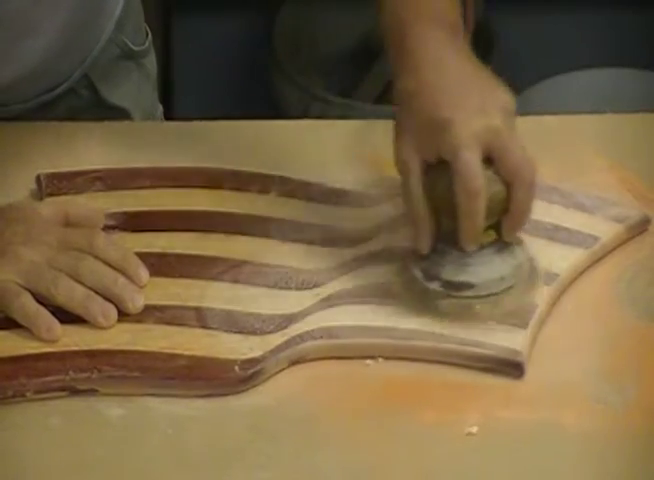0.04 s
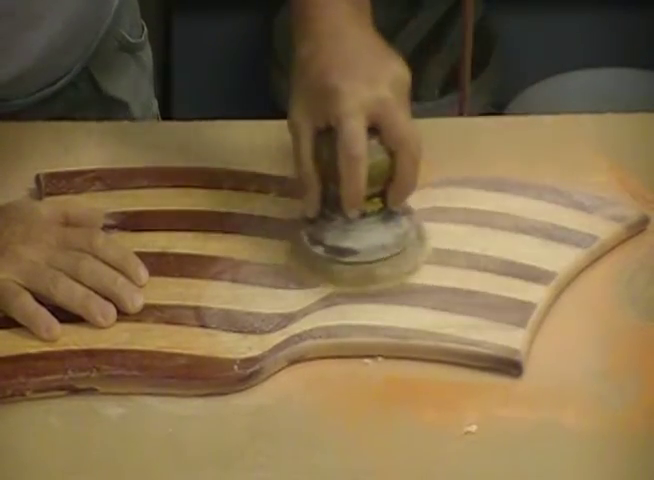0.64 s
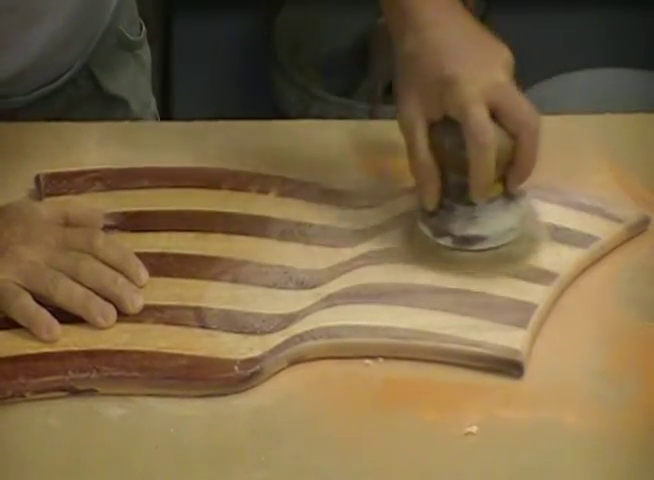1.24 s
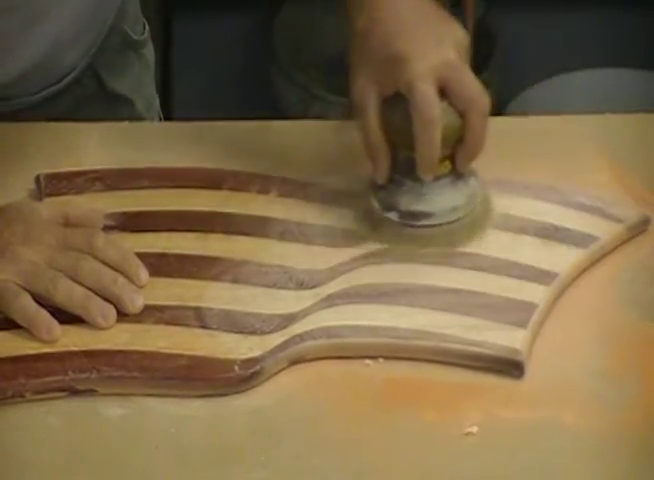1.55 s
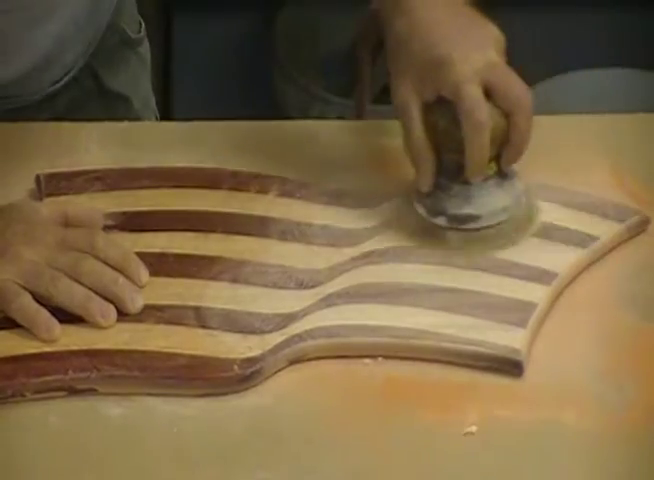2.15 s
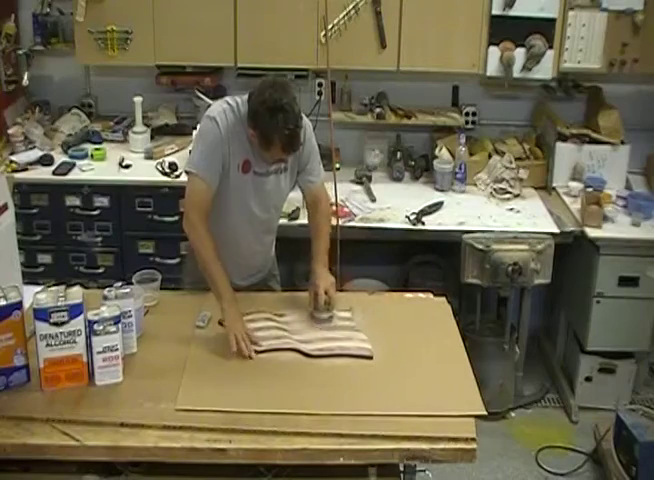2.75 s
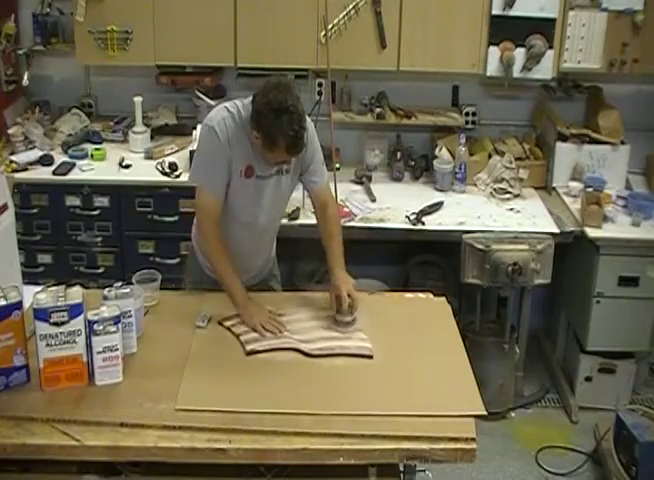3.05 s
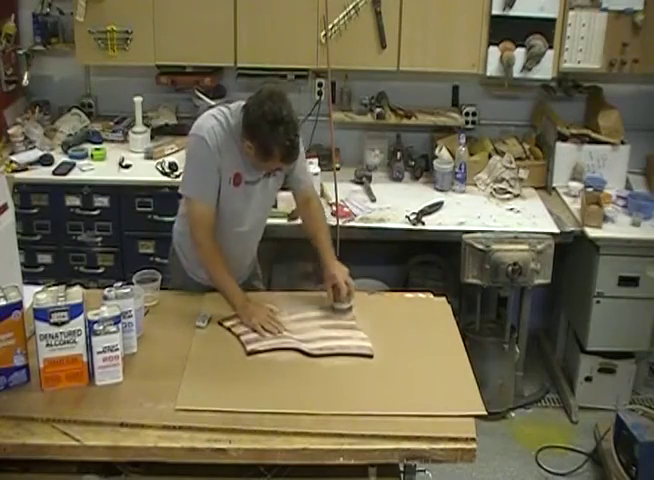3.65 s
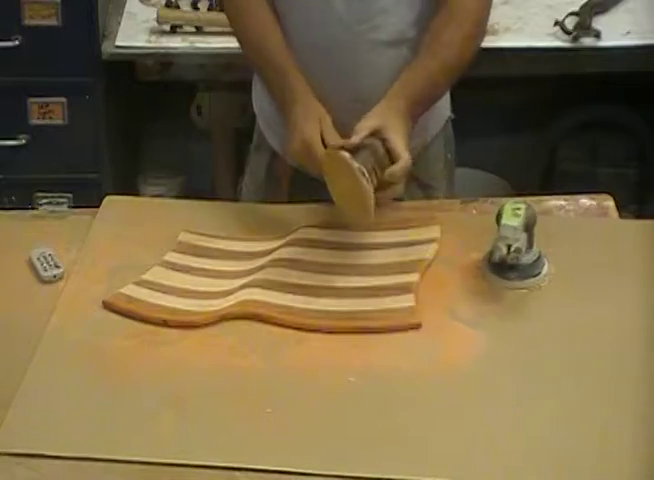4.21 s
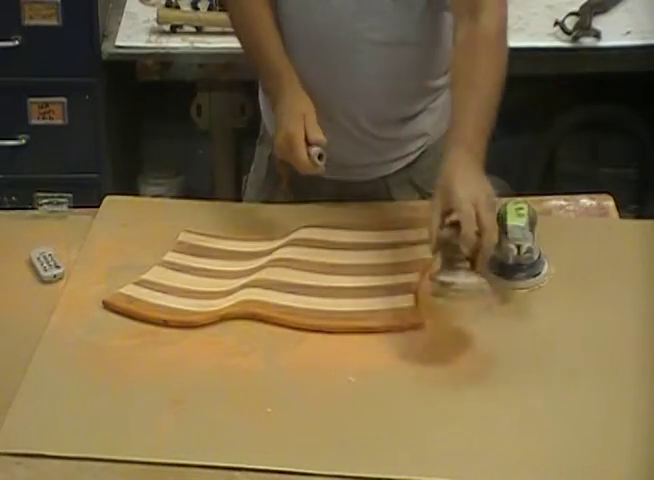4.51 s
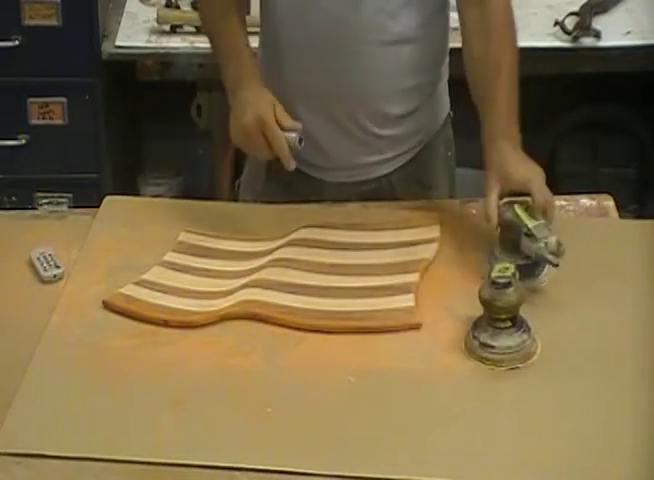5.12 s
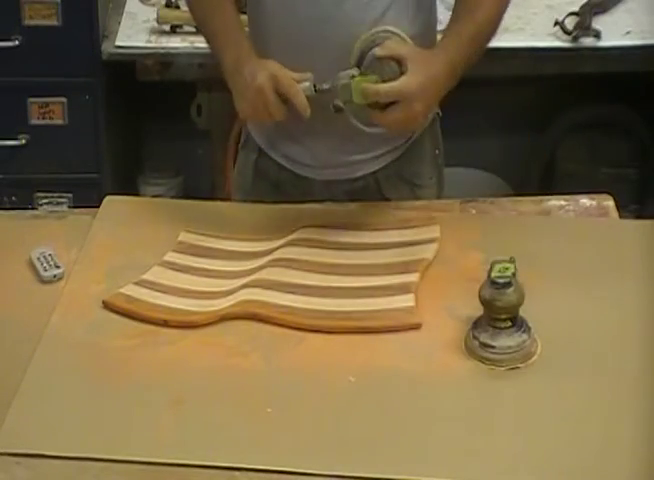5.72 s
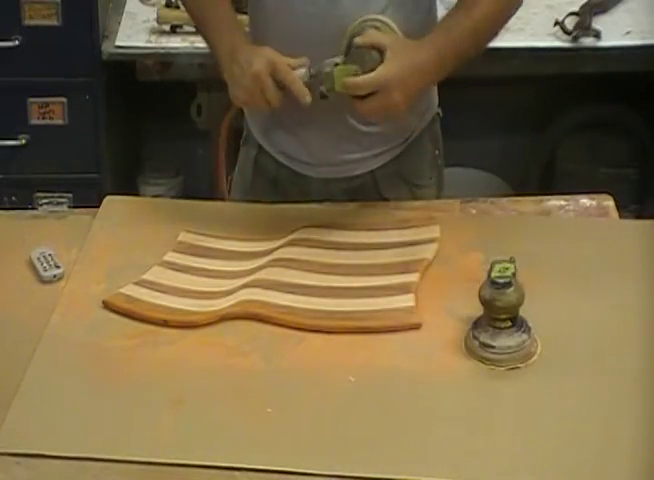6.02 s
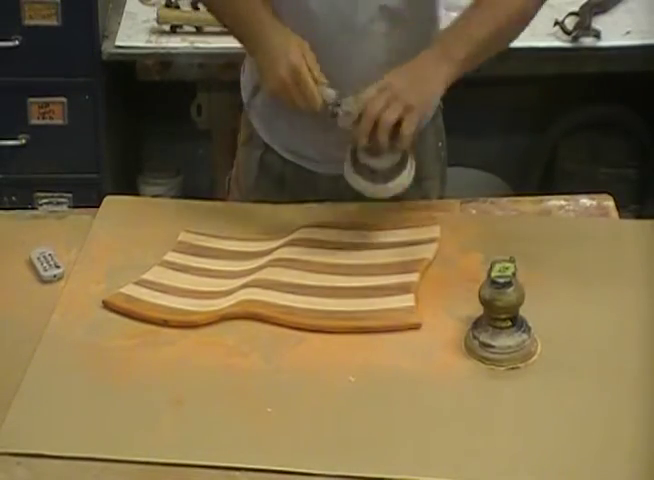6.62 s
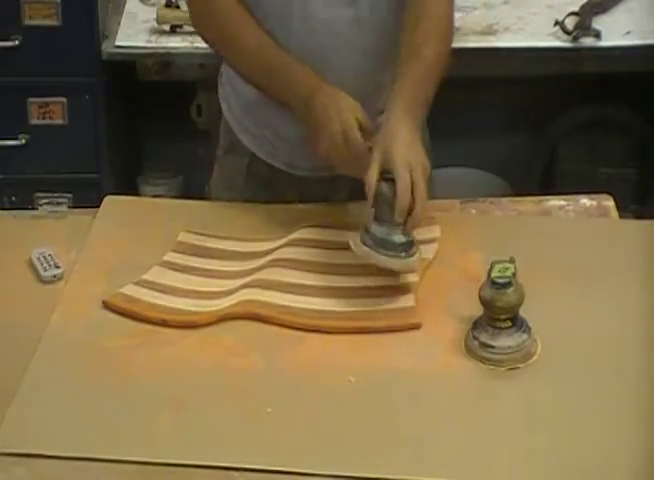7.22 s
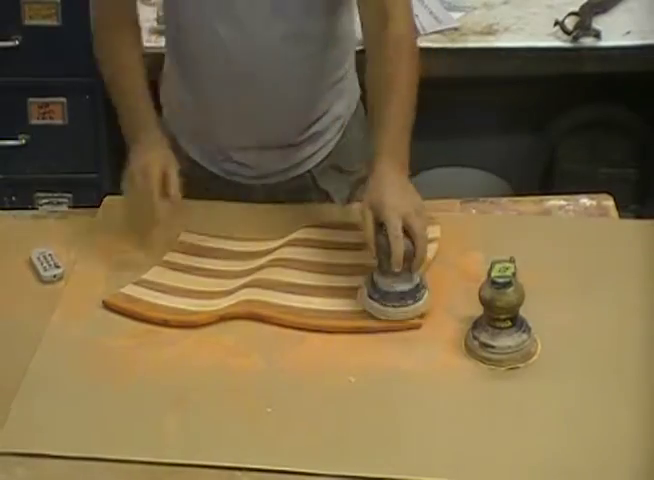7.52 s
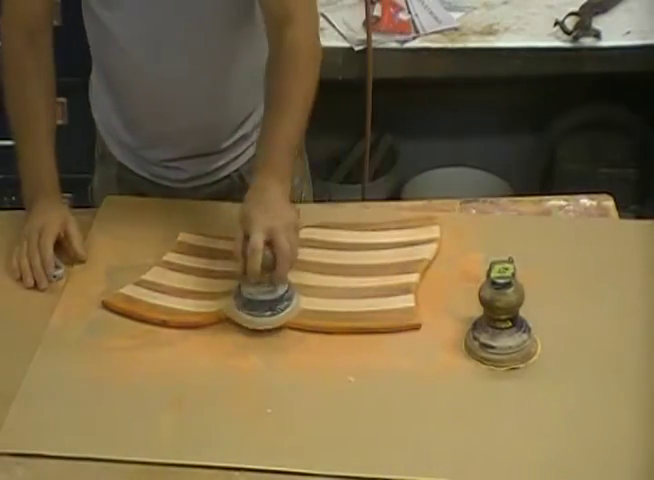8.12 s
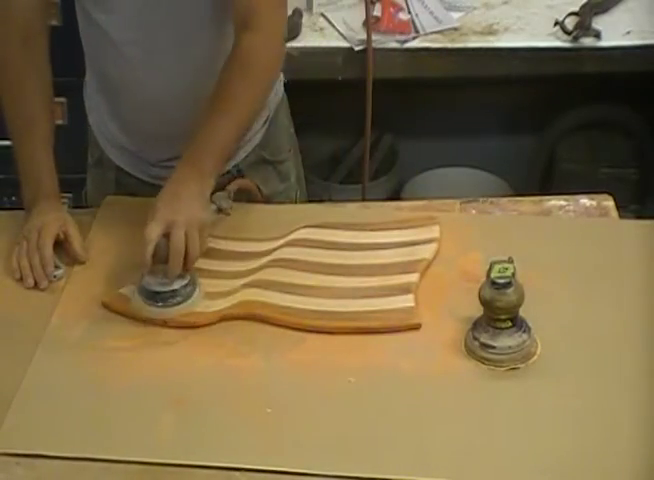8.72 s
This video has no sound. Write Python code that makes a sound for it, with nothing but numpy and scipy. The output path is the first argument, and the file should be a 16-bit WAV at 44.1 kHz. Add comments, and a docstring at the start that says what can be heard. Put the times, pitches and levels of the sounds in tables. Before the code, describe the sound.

An air sander whines and hisses on wood, stops, a hose coupling pops and hisses, then a second sander spins up.

```python
"""First comes the whine and hiss of an air-driven orbital sander on a wooden board, close to the
microphone, then from farther across the workshop. Vanes chop the air; the off-centre pad shakes and rubs.
The sound cuts off, the hose pops free, the coupler's sleeve rings and the tool is put down. The hose
is pushed, hissing, onto a second sander, which spins up on the board over a faint machinery hum.
The recorder's gain control ducks the pop and the hiss and lets the room swell back."""
import sys
import numpy as np
from scipy import signal
from scipy.fft import rfft, irfft, next_fast_len
from scipy.io import wavfile
from scipy.ndimage import uniform_filter1d

SR = 44100
rng = np.random.default_rng(int(sys.argv[2]) if len(sys.argv) > 2 else 0)


def write(x):
    x = np.atleast_2d(x).T
    wavfile.write(sys.argv[1], SR, np.round(np.clip(x, -1, 1) * 32767).astype(np.int16))


N = 390726
T = np.arange(N) / SR
FAR_START_S, FAR_END_S = 2.345, 4.054  # the microphone stands farther off
LEFT_RIGHT = np.array([[1], [-1]])


# Pad on the board: (frequency [Hz], density [dB])
SCRAPE_SPECTRUM = [(200, -55), (500, -19.5), (750, -14.5), (1050, -5.5), (1300, 0.5), (1700, -33.5),
                   (4000, -63.5)]

def sander(t, speed, levels, orders, upper, air, spin, whine_db, third_db, shake_db, drone_db, rub_db,
           scrape_db, flow_db, air_db, buzz_db, strain, waver, chop, jitter, flutter_db, pan_db,
           side_db, whistles=()):
    """Five vanes chop the air into a whine; the pad rubs once a turn. spin is the share of full speed."""
    full_hz, = curves(speed, t)
    first, second, third, rub, shake = curves(levels, t)
    sag_percent = 100 * (1 - full_hz / full_hz.mean())  # pressing down slows the motor
    # The grit grabs and lets go, so the speed trembles, most while the motor is slow.
    slack = np.clip(.92 - spin, 0, .3)
    sputter = np.clip(12 * (.998 - spin), 0, .75)
    tremble = (jitter + .16 * slack + .012 * sputter) * wobble(70, t)
    vane_phase = phase_of(spin * full_hz * (1 + tremble))
    shaft_phase = vane_phase / 5
    slip_phase = phase_of(25 * (1 + .35 * wobble(5, t)))  # the free-spinning pad adds side tones

    def partial(phase, echo=.24, spread=.12):
        """A tone that flutters, beats with its reflections and differs in phase left and right."""
        gain = amp(.7 * wobble(8, t) + flutter_db * wobble(75, t))
        phase = phase + rng.uniform(0, 2 * np.pi) + LEFT_RIGHT * spread * wobble(7.01, t)
        reflected = wobble(32, t) * np.sin(phase) + wobble(32, t) * np.cos(phase)
        direct = np.sin(phase + sputter * wobble(130, t)) * amp(6 * sputter * wobble(90, t) - 3 * sputter)
        return unit((direct + waver * echo * reflected) * gain)

    whine = sum(amp(db + dips(k, t)) * partial(k * vane_phase, echo, spread=.18)
                for k, db, echo in [(1, first, .15), (2, second, .22), (3, third + third_db, .28)])
    whine *= amp(whine_db) * spin ** 1.1
    exhaust_hz, width_hz = 3075, 30  # overtones swell as they cross this resonance
    for order, db in [(5 * k, db) for k, db in upper] + list(whistles):
        swell_db = 5 / (1 + ((order * spin * full_hz / 5 - exhaust_hz) / width_hz) ** 2)
        gain = spin ** 9 * amp(flow_db + db - 10 * sputter + swell_db + 1.8 * wobble(8, t))
        whine += gain * partial(order * shaft_phase, echo=.5, spread=.18)

    shaft = [amp(db) * partial(k * shaft_phase) for k, db in orders]
    side_tones = sum(amp(db) * partial(k * shaft_phase + slip_phase) for k, db in orders[5:])
    body = spin ** 5 * amp(shake + shake_db) * unit(sum(shaft[:2]))
    housing = spin * amp(drone_db + 1.5 * strain * sag_percent) * unit(sum(shaft[2:4]))
    pad = spin ** 1.2 * amp(rub + rub_db) * unit(sum(shaft[5:]) + amp(side_db) * side_tones)
    scrape = amp(rub + scrape_db) * unit(rush(SCRAPE_SPECTRUM, t) * (1 + .5 * np.sin(shaft_phase)))
    buzz = amp(flow_db + buzz_db) * spin ** 9 * vane_buzz(shaft_phase, t)
    hiss = amp(flow_db + air_db) * exhaust_hiss(air, chop, shaft_phase, t)
    return (whine + body + housing + pad + scrape + buzz + hiss) * amp(LEFT_RIGHT * pan_db)


# Gaps in the whine: (time [s], vane harmonic, depth [dB])
WHINE_DIPS = [(0.13, 2, 8), (0.17, 1, 14), (0.485, 2, 17), (0.605, 2, 8), (0.635, 2, 10), (0.67, 1, 9),
              (0.89, 1, 8), (1.15, 2, 12), (1.3, 2, 6), (1.345, 2, 9), (1.43, 2, 6), (1.585, 1, 9),
              (1.61, 2, 13), (1.675, 2, 15), (1.71, 2, 11), (1.765, 1, 10), (1.83, 2, 7), (1.91, 1, 9),
              (1.925, 2, 12), (2.025, 2, 14), (2.06, 2, 16), (2.135, 2, 12), (2.21, 2, 9), (2.265, 2, 11),
              (2.31, 2, 12), (2.73, 1, 9), (2.803, 3, 17), (2.815, 1, 13), (3.11, 3, 14), (3.285, 1, 19),
              (3.41, 1, 9), (3.505, 1, 9), (3.595, 1, 15), (3.737, 3, 14), (3.77, 1, 16), (3.853, 1, 11),
              (3.945, 1, 12), (3.98, 1, 13), (7.765, 1, 10), (7.86, 1, 8)]

def dips(harmonic, t, fade_s=.012):
    """Change in dB as one vane harmonic drops out for a moment."""
    return sum(-db * np.exp(-abs(t - s) / fade_s) for s, k, db in WHINE_DIPS if k == harmonic)


# Hiss, stroke by stroke: (time [s], level [dB])
HISS_LEVELS = [(0, -.3), (.3, .3), (.42, -1.7), (.52, 0), (1.15, -.2), (1.35, -1.4), (1.52, -1), (1.68, .7),
               (1.81, 2), (1.93, .9), (2.3, 1.1), (2.45, 1), (2.55, -2), (2.7, -1.5), (2.78, 1), (3.0, .8),
               (3.13, -2), (3.25, 0), (3.65, .4), (3.75, 2.6), (3.9, .9), (4.03, -2.3), (7.64, 1),
               (8.04, -1), (8.21, 1.2), (8.5, -.3), (8.7, .5), (8.85, -.3)]

def exhaust_hiss(spectrum, chop, shaft_phase, t):
    """Air puffs at the vane rate and twice a turn; the colour shifts as the grit meets new grain."""
    puffs = 1 + chop * (np.sin(5 * shaft_phase) + np.sin(2 * shaft_phase))
    air = patchy(rush(spectrum, t), depth_db=1.3)
    flicker = amp(.45 * wobble(35, t) + .3 * wobble(9, t))
    stroke_db, = curves(HISS_LEVELS, t)
    return amp(stroke_db) * unit(air * puffs * flicker)


# Muffler: (frequency [Hz], gain [dB])
MUFFLER_RESPONSE = [(1300, -5), (2200, -1), (3500, -1), (4600, -1), (5700, 3.5), (6600, 6), (7200, -2),
                    (8000, -10)]

def vane_buzz(shaft_phase, t):
    """Unequal vanes sound the shaft orders between the vane harmonics, through the muffler."""
    buzz = sum(np.sin(k * shaft_phase + rng.uniform(0, 2 * np.pi) + .3 * wobble(50, t))
               * amp(3.2 * wobble(8, t)) for k in range(11, 58) if k % 5)
    return unit(filtered(buzz, lambda hz: amp(along(MUFFLER_RESPONSE, hz))))


# Motor speed under the hand: (time [s], vane rate [Hz])
NEAR_VANE_RATE = [(0, 693), (0.08, 696), (0.23, 709), (0.45, 715.5), (0.74, 695), (0.9, 703.6),
                  (1.1, 709.7), (1.32, 719), (1.5, 724), (1.67, 701), (1.85, 694), (2.07, 711), (2.21, 697),
                  (2.329, 690)]
# Travel over the board: (time [s], vane harmonics 1, 2, 3 [dB], pad rub [dB], shake [dB])
NEAR_STROKES = [(0.0, -37, -24, -41, -34, -43), (0.08, -28.5, -15, -37, -35, -50.5),
                (0.15, -28, -21.5, -36, -35, -50), (0.25, -26, -17, -35, -35, -48),
                (0.37, -21, -22, -34, -36.5, -47), (0.54, -27, -17.5, -35, -34, -46),
                (0.66, -35, -17, -36, -26.5, -45), (0.72, -26, -25, -38, -26, -44),
                (0.77, -25.5, -20, -39.5, -25.5, -44), (0.82, -31, -14.5, -38, -25, -48),
                (0.9, -33, -20.5, -37, -27, -51.5), (0.99, -27, -17.5, -35, -25, -50),
                (1.13, -32, -29, -41, -26, -48), (1.21, -23, -19, -34.5, -28, -43.5),
                (1.49, -25, -22.5, -39, -25.5, -39), (1.58, -28, -22.5, -38, -32, -40.5),
                (1.7, -24.5, -19.5, -35, -31, -44), (1.91, -26.5, -26, -32, -34, -49),
                (2.07, -27, -24.5, -34, -32, -43), (2.19, -26.5, -21, -38, -28.5, -41),
                (2.26, -22, -25, -38, -31, -41), (2.33, -28, -30, -37, -35, -41)]
# Low shaft tones: (shaft order, level [dB])
NEAR_SHAFT = [(1, -21.5), (2, -20), (3, -17), (4, -8.5), (5, 0), (6, -11.5), (7, -14.5), (8, 0), (9, -2),
              (12, -11)]
# Top of the whine: (vane harmonic, level against the airflow [dB])
NEAR_OVERTONES = [(4, -12), (5, -16.5), (6, -24), (7, -22), (8, -24), (9, -20)]
# Exhaust air and grit: (frequency [Hz], density [dB])
NEAR_EXHAUST = [(25, -46.5), (100, -31), (300, -17), (550, -18), (800, -14), (1080, -7), (1300, -1),
                (1560, -6), (1900, -3), (2700, 0.5), (3300, -3.5), (4600, -3), (6500, -0.5), (10000, -2.5),
                (12500, -14.5), (15500, -30)]

def near_sander():
    """The first sander at the bench, microphone close: a clear whine over bright hiss."""
    return sander(T[T < FAR_START_S], NEAR_VANE_RATE, NEAR_STROKES, NEAR_SHAFT, NEAR_OVERTONES,
                  NEAR_EXHAUST, spin=1, whine_db=.7, third_db=-2, shake_db=0, drone_db=-39,
                  rub_db=-1, scrape_db=-22, side_db=11, flow_db=-22.5, air_db=1.7, buzz_db=-7.5,
                  strain=-.6, waver=.9, chop=.02, jitter=.0015, flutter_db=1.05, pan_db=.2)


# Motor speed under the hand: (time [s], vane rate [Hz])
FAR_VANE_RATE = [(2.37, 620), (2.509, 594.7), (2.57, 589.3), (2.72, 618.7), (2.83, 607), (2.95, 610.7),
                 (3.09, 632), (3.15, 633), (3.348, 604.3), (3.43, 597.4), (3.621, 611), (3.779, 617.6),
                 (3.85, 614.6), (3.97, 587), (4.051, 598.5)]
# Travel over the board: (time [s], vane harmonics 1, 2, 3 [dB], pad rub [dB], shake [dB])
FAR_STROKES = [(2.35, -22, -28, -31, -34.5, -38), (2.44, -25.5, -28, -22.5, -29, -38),
               (2.49, -22, -28, -26, -26, -38), (2.56, -24.5, -27.5, -21, -23.5, -38),
               (2.66, -20, -27.5, -29, -30.5, -38), (2.74, -25, -23, -29, -34, -45),
               (2.84, -26, -30.5, -21.5, -31, -35.5), (3.0, -27, -22, -26.5, -29, -35),
               (3.08, -17, -25.5, -28, -27.5, -41.5), (3.22, -19, -26.5, -26, -39, -37.5),
               (3.28, -22, -31.5, -23, -32, -36.5), (3.35, -21.5, -24, -28, -32, -42),
               (3.42, -24, -17.5, -29, -32.5, -51), (3.5, -28, -22.5, -26.5, -32, -38),
               (3.56, -25, -22.5, -30, -20, -41), (3.64, -25, -25, -27, -27.5, -40),
               (3.7, -24.5, -28, -23.5, -31, -39), (3.78, -28, -32, -25, -32, -38.5),
               (3.85, -23.5, -30, -21.5, -31, -40), (3.9, -21.5, -24.5, -25.5, -27.5, -51),
               (4.05, -24.5, -24, -29, -35.5, -45)]
# Low shaft tones: (shaft order, level [dB])
FAR_SHAFT = [(1, -32), (2, -9), (3, -14), (4, -22.5), (5, 0), (6, -18), (7, -19), (8, -11.5), (9, -11)]
# Top of the whine: (vane harmonic, level against the airflow [dB])
FAR_OVERTONES = [(4, -14), (5, -11), (6, -17), (7, -26), (8, -25), (9, -18), (10, -16)]
# Exhaust air and grit: (frequency [Hz], density [dB])
FAR_EXHAUST = [(25, -47), (100, -47.5), (300, -26.5), (800, -3.5), (1300, -2), (2100, -1), (3100, -1),
               (5000, -5), (6600, 5), (7700, -0.3), (10000, -3.7), (12500, -14), (15500, -38.5)]

def far_sander():
    """The same sander from farther off, running slower and beating more with its reflections."""
    t = T[(T >= FAR_START_S) & (T < FAR_END_S)]
    return sander(t, FAR_VANE_RATE, FAR_STROKES, FAR_SHAFT, FAR_OVERTONES, FAR_EXHAUST,
                  spin=1, whine_db=.6, third_db=-.4, shake_db=1.6, drone_db=-35.3,
                  rub_db=-.7, scrape_db=-3.5, side_db=-12, flow_db=-22.2, air_db=0, buzz_db=-6,
                  strain=1.3, waver=1.35, chop=.09, jitter=.006, flutter_db=1.7, pan_db=0)


# Speed the motor settles to: (time [s], vane rate [Hz])
SECOND_VANE_RATE = [(7.9, 692), (8.0, 687.5), (8.15, 682), (8.3, 669.7), (8.47, 664.6), (8.68, 667.6),
                    (8.85, 666)]
# Travel over the board: (time [s], vane harmonics 1, 2, 3 [dB], pad rub [dB], shake [dB])
SECOND_STROKES = [(7.63, -23, -23, -24, -30, -45.5), (7.69, -17, -21.5, -21, -29, -45.5),
                  (7.76, -19, -21.5, -28, -31, -45.5), (7.82, -16.5, -20.5, -25.5, -31, -46),
                  (7.89, -17, -33, -30, -33, -47.5), (8.03, -18.5, -29, -28, -41, -43),
                  (8.17, -17.5, -36.5, -32, -32.5, -45), (8.29, -25.5, -27.5, -27, -27, -43),
                  (8.37, -18.5, -28, -32.5, -24, -49), (8.69, -22.5, -26.5, -28.5, -34, -43),
                  (8.84, -19.5, -23.5, -30.5, -37.5, -48)]
# Low shaft tones: (shaft order, level [dB])
SECOND_SHAFT = [(1, -29.5), (2, -27), (3, -15.5), (4, -18.5), (5, 0), (6, -25.5), (7, -12.5), (8, -12.5),
                (9, -11.5)]
# Top of the whine: (vane harmonic, level against the airflow [dB])
SECOND_OVERTONES = [(4, -9.5), (5, -13.5), (6, -17.5), (7, -19), (8, -17.5), (9, -18.5), (10, -14)]
# Exhaust air and grit: (frequency [Hz], density [dB])
SECOND_EXHAUST = [(25, -44), (100, -40), (300, -37.5), (600, -8), (1300, -4), (1700, -5), (3000, -2.5),
                  (4800, -7), (6400, 2.5), (7500, 0), (10000, -3), (12500, -11.5), (15500, -31.5)]
# Thin exhaust whistles: (shaft order), and for each (level against the airflow [dB])
WHISTLE_MULTIPLES = (22, 27, 42, 44, 49, 51, 53)
WHISTLE_LEVELS = [-21, -22, -16, -11.5, -12, -19, -19]
THROTTLE_S = 7.566

def second_sander(valve_opens_s=.05, spin_up_s=.134):
    """The lever opens the valve and the second sander runs up from rest on the board."""
    t = T[T >= THROTTLE_S]
    spin = np.tanh((t - THROTTLE_S) / spin_up_s)
    valve = np.minimum(1, (t - THROTTLE_S) / valve_opens_s) ** 4
    return valve * sander(t, SECOND_VANE_RATE, SECOND_STROKES, SECOND_SHAFT, SECOND_OVERTONES,
                          SECOND_EXHAUST, spin, whine_db=.4, third_db=0, shake_db=-.5, drone_db=-39.5,
                          rub_db=-1, scrape_db=-6.5, side_db=-13, flow_db=-23.3, air_db=-.8,
                          buzz_db=-4.8, strain=.8, waver=.8, chop=.14, jitter=.001, flutter_db=.77,
                          pan_db=-.3, whistles=zip(WHISTLE_MULTIPLES, WHISTLE_LEVELS))


# Juddering pad: (frequency [Hz], density [dB])
JUDDER_SPECTRUM = [(90, -60), (180, -26), (330, -5), (600, 0), (900, -1), (1400, -4), (3000, -9),
                   (4500, -17), (5700, -11), (9000, -40)]

def judder():
    """The second sander's pad judders while it gathers speed."""
    envelope = burst(7.598, attack_s=.035, hold_s=.14, fall_db_per_s=110)
    return amp(-21) * envelope * rush(JUDDER_SPECTRUM, T) * amp(2.5 * wobble(60, T))


# Escaping air, pop and leak: (frequency [Hz], density [dB])
POP_SPECTRUM = [(110, -40), (230, -3), (500, 6.5), (800, 4), (1250, -8), (1800, -3), (2500, -6.5),
                (4000, -2.5), (6000, 1), (9000, 3), (12000, -2), (15500, -19)]
LEAK_SPECTRUM = [(100, -48), (500, -17), (1600, -19), (2800, -14), (4800, -6.5), (5700, -2.5), (6800, -1),
                 (8200, 2.5), (10700, 2.5), (13000, -7.5), (15500, -6)]
# The plug strikes home: (time [s], level [dB])
SEATING_HITS = [(6.1169, -2.5), (6.194, -6), (6.222, -4.5)]
# Its socket: (frequency [Hz], level [dB], t60 [s])
SOCKET_MODES = [(520, -9, 0.05), (1560, -8, 0.06), (1730, -6, 0.065), (2120, -8.5, 0.03),
                (3650, -10, 0.036)]

def coupler(jet_low_hz=140):
    """Air pops as the hose comes off; later it seeps at the valve and gushes until the plug seals."""
    pop = amp(-3.5) * burst(4.2935, attack_s=.0025, hold_s=.003, fall_db_per_s=1900)
    pop = pop * rush(POP_SPECTRUM, T)
    seep = amp(-28) * burst(6.107, attack_s=.003, hold_s=.008, fall_db_per_s=1000)
    gush = amp(-2.3) * burst(6.1155, attack_s=.004, hold_s=.132, fall_db_per_s=480)
    joining = (seep + gush) * rush(LEAK_SPECTRUM, T) * amp(1.4 * wobble(82, T))
    t = T[:SR // 8]
    for s, db in SEATING_HITS:
        clack = amp(-5) * impact(KNOCK_SPECTRUM, t, t60=.035)
        add(joining, s, amp(db) * (clack + amp(-2) * ringing(SOCKET_MODES, t)))
    bass_cut = lambda hz: hz ** 4 / (hz ** 4 + jet_low_hz ** 4)  # so small a jet makes no bass
    return filtered(room(pop, wet_db=-3.6) + room(joining, wet_db=-6.8), bass_cut)


# Sleeve's click: (frequency [Hz], density [dB])
SLEEVE_SPECTRUM = [(1500, -25), (3500, -8), (5000, -3), (6300, -4), (7500, 3), (8800, 1), (11000, 0),
                   (12300, 5), (13500, -12), (15500, -18)]
# Its ring: (frequency [Hz], level [dB], t60 [s])
SLEEVE_MODES = [(7407, -12, 0.4), (7892, -10, 0.3), (8270, -15, 0.25), (9356, -15, 0.3), (11500, -19, 0.3),
                (12130, -1, 0.31), (12215, 0, 0.31), (12310, 0, 0.31), (12420, -6, 0.22)]

def sleeve(snap_s=4.502):
    """The coupler's sprung steel sleeve snaps back with a click and a thin, beating ring."""
    click, ring, t = np.zeros((2, N)), np.zeros((2, N)), T[:SR // 2]
    add(click, snap_s, amp(-13) * impact(SLEEVE_SPECTRUM, t, t60=.026))
    add(ring, snap_s, amp(-29) * ringing(SLEEVE_MODES, t))
    return room(click, wet_db=-5.5) + room(ring, wet_db=-9)


# The plug feels for its socket: (time [s], level [dB], relative ring [dB])
PLUG_HITS = [(5.888, -21.5, -14), (5.901, -23, -4), (5.911, -33, -16), (5.928, -21.5, -18),
             (5.934, -28, -18)]
# Its click: (frequency [Hz], density [dB])
PLUG_SPECTRUM = [(300, -20), (1500, 0), (3000, -3), (5500, -1), (9000, -5), (11500, -17), (15500, -30)]
# Its ring: (frequency [Hz], level [dB], t60 [s])
PLUG_MODES = [(1554, -1, 0.04), (2350, -6, 0.03), (3790, 0, 0.018), (4030, 0, 0.018), (5390, -4, 0.02),
              (6540, -6, 0.02), (9110, -10, 0.02)]

def plug():
    """The steel plug clicks against the rim of its socket."""
    out, t = np.zeros((2, N)), T[:SR // 8]
    for s, db, ring_db in PLUG_HITS:
        click = amp(-2) * impact(PLUG_SPECTRUM, t, t60=.013)
        add(out, s, amp(db) * (click + amp(ring_db) * ringing(PLUG_MODES, t)))
    return room(out, wet_db=-2.5)


# Handling at the bench: (time [s], level [dB], relative tick [dB], relative ring [dB])
TOOL_HITS = [(4.707, -27, -6, -24), (4.742, -32, -4, -16), (4.785, -26, -3, -15), (4.811, -29, -14, -18),
             (5.772, -20.5, -34, -45), (6.857, -35.5, -18, -40), (7.581, -32, -10, -25),
             (7.592, -27, -14, -30), (7.614, -16, -10, -30)]
# Dull knock and bright tick: (frequency [Hz], density [dB])
KNOCK_SPECTRUM = [(100, -26.5), (400, -5.5), (1000, 0), (1600, 2.5), (2400, -1.5), (3600, -4.5), (6000, -7),
                  (10000, -26), (15000, -37)]
TICK_SPECTRUM = [(1500, -37.5), (5000, -8), (8500, 7.5), (11000, -5), (15500, -21.5)]
# The tool's metal body: (frequency [Hz], level [dB], t60 [s])
TOOL_MODES = [(1554, 0, 0.066), (2401, -4, 0.25), (3585, -8, 0.6), (4635, -11, 0.35), (5523, -11, 0.35),
              (6713, -8, 0.29), (8950, -12, 0.3), (12950, -9, 0.3)]

def knocks():
    """Tool on bench, hand on tool and the throttle lever, with plenty of room at the microphone."""
    out, t = np.zeros((2, N)), T[:SR // 3]
    for s, db, tick_db, ring_db in TOOL_HITS:
        knock = amp(-4.5) * impact(KNOCK_SPECTRUM, t, t60=.046)
        tick = amp(tick_db + 4.5) * impact(TICK_SPECTRUM, t, t60=.015)
        add(out, s, amp(db) * (knock + tick + amp(ring_db) * ringing(TOOL_MODES, t)))
    return room(out, wet_db=.5)


# Background machinery: (frequency [Hz], level [dB])
MACHINE_TONES = [(236.9, -53), (290.7, -62.5), (328.4, -51), (387.6, -53.5), (479.1, -65.5), (602.9, -58),
                 (721.4, -66.5), (812.9, -74), (942.1, -69.5), (1012, -64)]
# Room tone: (frequency [Hz], density [dB])
SHOP_SPECTRUM = [(15, -97.5), (25, -68.5), (75, -44.5), (91, -26.5), (227, -8), (267, -9.5), (389, -4.5),
                 (445, -14.5), (614, -17.5), (666, -17), (1200, -23.5), (1660, -23), (2770, -33),
                 (8810, -40), (15500, -63)]

def workshop():
    """Machinery drones in the background from 4.05 s on."""
    hum = sum(amp(db + 1.5 * wobble(1.8, T)) * np.sin(2 * np.pi * hz * T + .53 * wobble(4, T))
              for hz, db in MACHINE_TONES)
    return (amp(1.5) * hum + amp(-45) * rush(SHOP_SPECTRUM, T)) * (T >= FAR_END_S)


# Workshop reverberation: (frequency [Hz], t60 [s])
ROOM_DECAY = [(150, 0.38), (1000, 0.67), (4000, 0.68), (8000, 0.49), (14000, 0.26)]

def room(x, wet_db, build_s=.0088):
    """Add the workshop's diffuse echo: energy lingers as noise, longest in the midrange."""
    hz, s, spectra = signal.stft(x, SR, nperseg=256)
    s = s[s < .9]
    decay = (amp(-60 * s / along(ROOM_DECAY, hz)[:, None]) * (1 - np.exp(-(s + 1e-4) / build_s))) ** 2
    decay /= decay.sum(1, keepdims=True)
    power = np.mean(abs(spectra) ** 2, axis=0)
    lingering = signal.fftconvolve(power, decay, axes=1)[:, :power.shape[1]]
    envelope = np.sqrt(abs(uniform_filter1d(lingering, size=3, axis=0)))
    noise = signal.stft(rush([(20, 0), (20000, 0)], T), SR, nperseg=256)[2]
    noise /= np.sqrt(np.mean(abs(noise) ** 2))
    echo = signal.istft(noise * envelope, SR, nperseg=256)[1]
    return x + amp(wet_db) * echo[:, :N]


# At the stereo microphone: (frequency [Hz], left-right correlation)
MIC_CORRELATION = [(40, 0.65), (200, 0.95), (1000, 0.81), (2500, .82), (5000, 0.74), (8000, 0.7),
                   (12000, 0.59)]

def rush(spectrum, t):
    """Coloured stereo noise of rms 1; the spectrum sets only its shape."""
    def response(hz):
        angle = np.arccos(np.clip(along(MIC_CORRELATION, hz), -1, 1)) / 2
        return amp(along(spectrum, hz)) * np.array([np.cos(angle), np.sin(angle)])
    mid, side = filtered(rng.standard_normal((2, len(t))), response)
    return unit(np.array([mid + side, mid - side]))


def patchy(x, depth_db):
    """Give a noise patches of random gain, about 700 Hz wide and 90 ms long."""
    spectra = signal.stft(x, nperseg=512)[2]
    patches = uniform_filter1d(rng.standard_normal(spectra.shape[1:]), size=8, axis=0)
    patches = uniform_filter1d(patches, size=15, axis=1)
    return signal.istft(spectra * amp(depth_db * unit(patches)), nperseg=512)[1][:, :x.shape[-1]]


def impact(spectrum, t, t60):
    """Noise that dies by 60 dB in t60 seconds."""
    return amp(-60 * t / t60) * rush(spectrum, t)


def ringing(modes, t):
    """Damped modes, struck a little differently each time."""
    return sum(amp(db + rng.normal(0, 2.4) - 60 * t / t60)
               * np.sin(2 * np.pi * hz * t + rng.uniform(0, 2 * np.pi)) for hz, db, t60 in modes)


def burst(start_s, attack_s, hold_s, fall_db_per_s):
    """Gain that rises to 1, holds and falls."""
    t = T - start_s
    return np.clip(t / attack_s, 0, 1) * amp(-fall_db_per_s * np.maximum(t - attack_s - hold_s, 0))


def wobble(rate, t):
    """A smooth random curve with rate knots a second."""
    step = int(SR / rate)
    knots = rng.standard_normal(1024)[:len(t) // step + 2, None]
    ease = np.sin(np.arange(step) / step * np.pi / 2) ** 2
    return (knots[:-1] + np.diff(knots, axis=0) * ease).ravel()[:len(t)]


def phase_of(hz):
    """Running phase of a changing frequency."""
    return 2 * np.pi * np.cumsum(hz) / SR


def amp(db):
    """Decibels to gain."""
    return 10 ** (np.asarray(db) / 20)


def unit(x):
    """Scale to rms 1."""
    return x / np.sqrt(np.mean(x ** 2) + 1e-20)


def along(points, hz):
    """(frequency [Hz], value) points read on a log axis."""
    freqs, values = np.transpose(points)
    return np.interp(np.log(hz + 1), np.log(freqs + 1), values)


def curves(rows, t):
    """Each column after the time, read at the times t."""
    times, *columns = np.transpose(rows)
    return [np.interp(t, times, column) for column in columns]


def filtered(x, response):
    """Filter x by a gain that depends on frequency."""
    n = x.shape[-1]
    padded = next_fast_len(n + 8192, True)
    return irfft(rfft(x, padded) * response(np.fft.rfftfreq(padded, 1 / SR)), padded)[..., :n]


def add(out, s, sound):
    """Mix a sound in at time s."""
    part = out[:, round(s * SR):][:, :sound.shape[-1]]
    part += sound[..., :part.shape[1]]


def scene():
    """The workshop at the microphone, everything slightly to the right."""
    sanders = np.zeros((2, N))
    add(sanders, 0, near_sander())
    add(sanders, FAR_START_S, far_sander())
    add(sanders, THROTTLE_S, second_sander())
    mix = sanders + judder() + knocks() + plug() + sleeve() + coupler() + workshop()
    return mix * amp(-.55 * LEFT_RIGHT)


def record(dry, limit_db=-13.9, release_db_per_s=102, treble_weight=.45, low_hz=70, top_hz=15700):
    """The recorder ducks at once on loud, bright sound, recovers steadily and trims both band edges."""
    power = np.mean(dry ** 2 + treble_weight * np.diff(dry, prepend=0) ** 2, axis=0)
    level_db = 10 * np.log10(np.abs(uniform_filter1d(power, size=260)) + 1e-12)
    over_db = np.maximum(level_db - limit_db, 0)
    duck_db = np.maximum.accumulate(over_db + release_db_per_s * T) - release_db_per_s * T
    low_cut = lambda hz: hz ** 2 / np.sqrt(hz ** 4 + low_hz ** 4)
    high_cut = lambda hz: (1 - np.tanh((hz - top_hz) / 150)) / 2
    return filtered(dry * amp(-duck_db), lambda hz: low_cut(hz) * high_cut(hz))


dry = scene()
out = record(dry)
write(out)
```